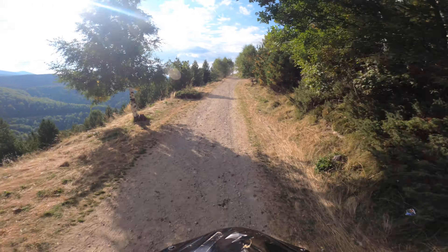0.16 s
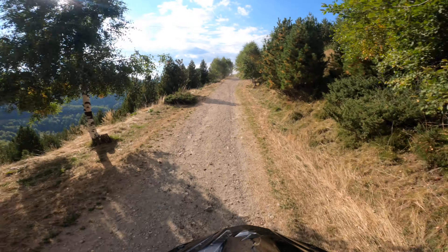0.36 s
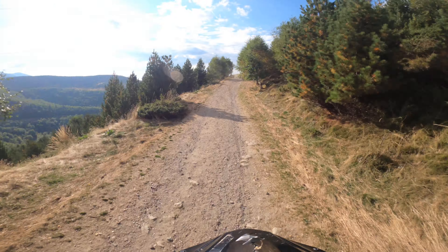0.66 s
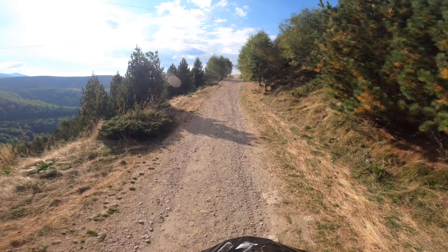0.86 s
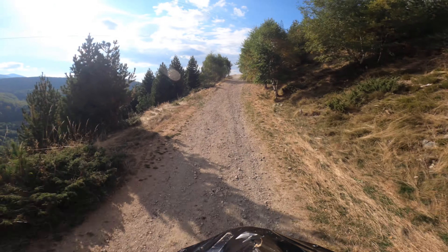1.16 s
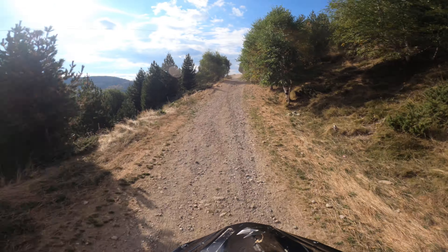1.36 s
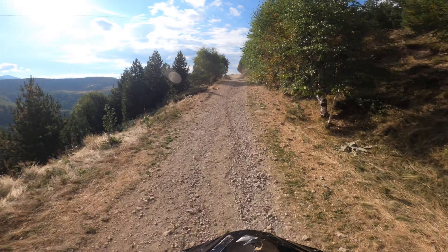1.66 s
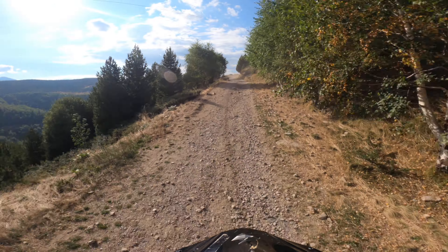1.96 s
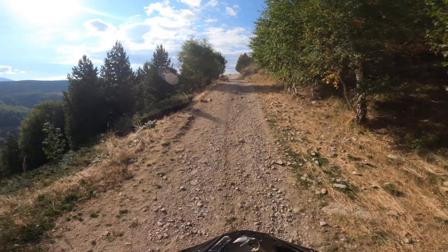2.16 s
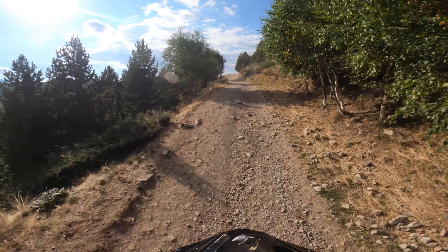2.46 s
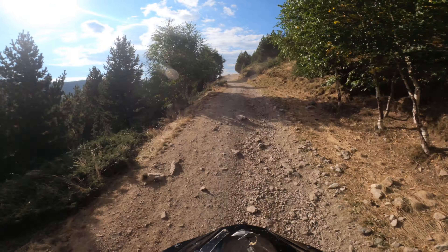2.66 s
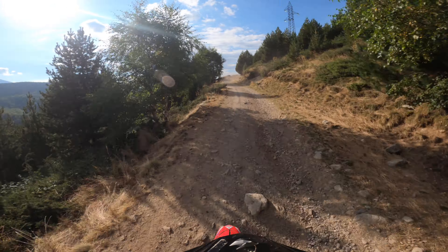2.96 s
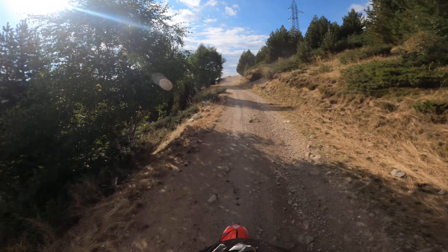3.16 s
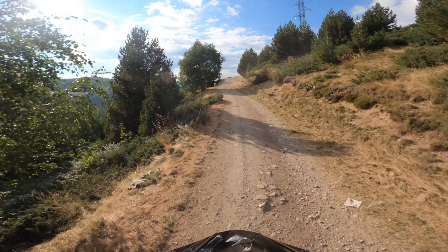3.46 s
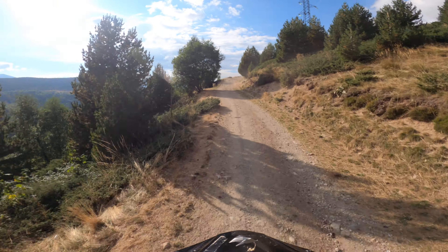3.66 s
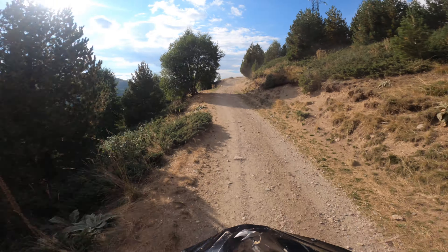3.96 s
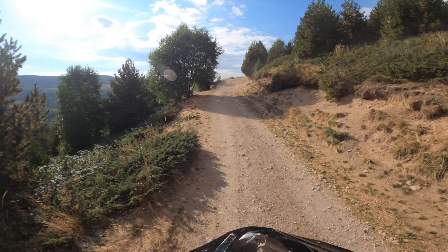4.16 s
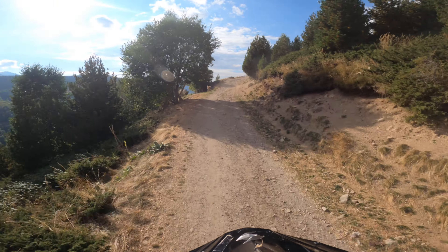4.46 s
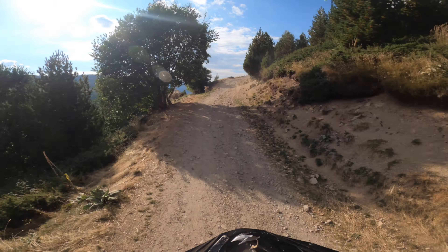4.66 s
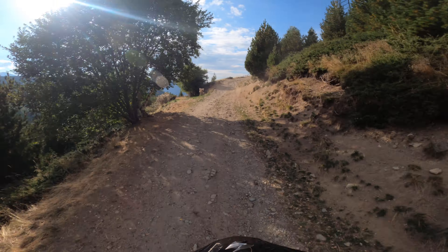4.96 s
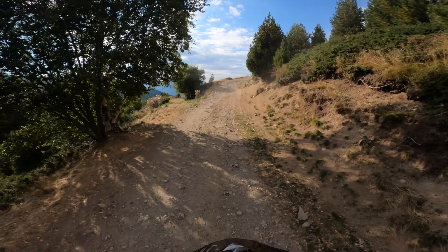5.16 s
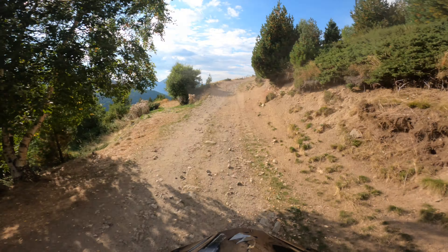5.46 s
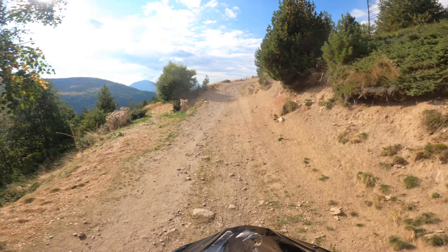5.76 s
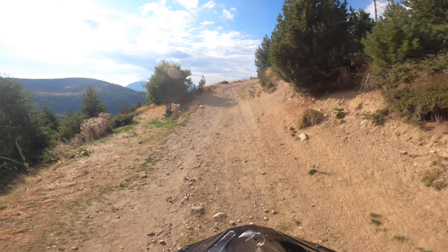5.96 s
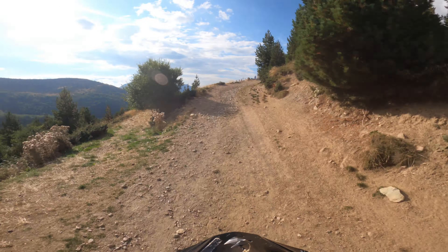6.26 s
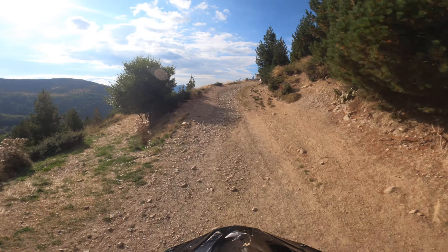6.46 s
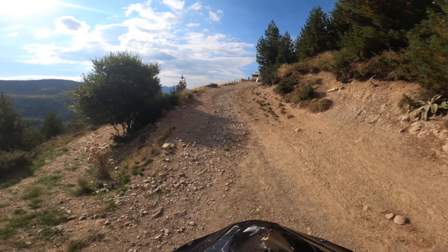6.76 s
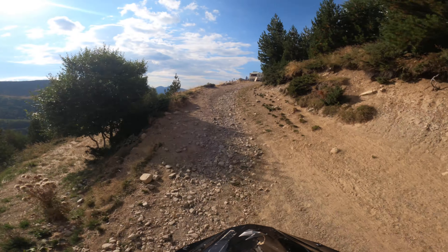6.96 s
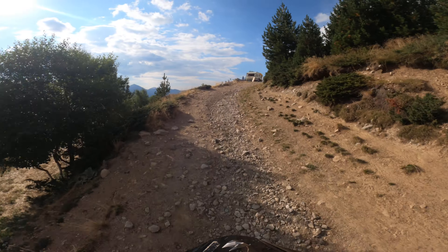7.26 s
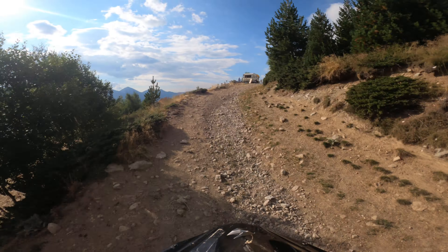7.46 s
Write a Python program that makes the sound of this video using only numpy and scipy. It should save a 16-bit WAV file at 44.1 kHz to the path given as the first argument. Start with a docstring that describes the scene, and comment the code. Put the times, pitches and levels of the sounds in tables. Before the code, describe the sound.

A single-cylinder four-stroke dirt bike is heard very close, from the rider's helmet, on an open gravel climb. A low wind buffet opens the scene and quickly eases while the engine throbs evenly on light throttle. At about 0.7 s it pulls harder, the revs rise slightly, loose gravel crunches, and metallic parts buzz along with each firing. From 2 to 3 s a low rumble of larger rocks joins in. At about 2.9 s the throttle opens wide: a loud, fuller, higher throb until 3.5 s, then a sudden drop, with a small flare near 3.8 s. From 4 s the revs sag steadily. After 5.5 s the beat turns ragged and raspy, strong and weak firings alternating, over crunching gravel and flung stones. By 6.7 s it lugs slowly and heavily to the end, a sharper stone tick near 6.8 s.

```python
"""Dirt bike climbing a gravel track

A single-cylinder four-stroke, heard from the rider's helmet: gas pulses ring the airbox and exhaust,
knocks and turbulence ring a rasp. The throttle opens, blips wide, then the revs sag and the engine limps.
Bike parts buzz, jolted once per cycle. Tyres roar, crunch and tick over loose stones, flick grit on each
power stroke and run over rocks; stones fly as decaying noise. Wind is noise that follows the gusts."""
import sys
import numpy as np
from scipy import signal
from scipy.fft import rfft, irfft
from scipy.io import wavfile
from scipy.ndimage import uniform_filter1d, minimum_filter1d

SR = 44100
rng = np.random.default_rng(int(sys.argv[2]) if len(sys.argv) > 2 else 0)


def master_out(mix):
    """Clip the mix to full scale and print it as 16-bit PCM to the path in sys.argv[1]."""
    frames = np.transpose(np.atleast_2d(mix))
    ceiling = np.clip(frames, -1, 1)
    pcm = np.round(ceiling * 32767).astype(np.int16)
    wavfile.write(sys.argv[1], SR, pcm)


N = 336042

# Throttle steps: 0 lugging, 1 stumbling, 2 light, 3 pulling, 4 wide open.
# Engine speed: t/s, firing rate/Hz
FIRING_RATE = [(0.0, 42.31), (0.14, 42.07), (0.25, 39.79), (0.38, 40.51), (0.61, 39.93), (0.65, 43.08),
               (0.7, 45.34), (0.82, 43.34), (1.02, 42.95), (1.2, 43.69), (1.49, 44.22), (1.58, 45.43),
               (1.65, 47.8), (1.76, 43.91), (1.87, 45.37), (2.01, 43.4), (2.13, 43.75), (2.24, 44.87),
               (2.35, 43.67), (2.66, 44.34), (2.95, 43.5), (3.07, 47.9), (3.13, 49.3), (3.22, 49.2),
               (3.3, 48.1), (3.39, 51.2), (3.46, 51.2), (3.53, 46.3), (3.62, 42.4), (3.69, 39.5),
               (3.75, 45.5), (3.8, 47.0), (3.88, 40.69), (4.1, 40.7), (4.46, 38.55), (4.65, 38.17),
               (5.07, 36.2), (5.45, 33.71), (5.8, 31.89), (6.2, 30.5), (6.5, 29.45), (6.56, 30.4),
               (6.61, 31.35), (6.68, 30.25), (6.98, 29.87), (7.13, 29.66), (7.36, 30.66), (7.62, 29.76)]
# Rider's hand: t/s, throttle step
THROTTLE = [(0, 2), (.6, 2), (.7, 3), (1.48, 3), (1.64, 3.3), (1.78, 3), (2.9, 3), (2.96, 4), (3.39, 4),
            (3.45, 3.4), (3.52, 2), (3.64, 1.85), (3.8, 2), (5.2, 2), (5.7, 1), (6.3, 1), (6.65, 0)]
# Source levels, one row per throttle step: thump/dB, rasp/dB, tyre roar/dB, grit/dB
STEP_LEVELS = [(-15.5, -29, -29, -49.5), (-19, -24.5, -29.5, -50.5), (-17.5, -32.5, -31, -51),
               (-17, -34, -26, -49), (-10, -33.5, -26.5, -46)]
# Unevenness of the firings at each throttle step (0-1)
STEP_UNEVENNESS = [.2, .6, .16, .15, .16]

# Airbox and exhaust resonances: f/Hz, width/Hz, polarity, five relative levels/dB (one per throttle step)
PIPE_MODES = [(74.6, 73, 1, -9.5, 4, -14, 1.5, 5.5), (142, 91.5, 1, -2, 4, 4, -5.5, -6),
              (186.3, 88, 1, -7, -15, -7, 4.5, -11.5), (241.6, 128, 1, -32.5, -2, -1, -1.5, 12),
              (327.1, 81.5, -1, -1.5, -4, 0.5, -1.5, -7.5), (303.4, 43, -1, -17, -12, -1.5, -18.5, 15.5),
              (358, 65, -1, -12.5, -27.5, -15, -29.5, 4.5), (605.5, 56, 1, -21.5, -8, -23, -13.5, -2),
              (760, 120, -1, -22, -19.5, -40, -17.5, -9.5), (470, 99, -1, -16.5, -14, -24.5, -34.5, -27.5)]
# Exhaust and engine casing resonances: columns as PIPE_MODES
RASP_MODES = [(610, 106, 1, -4.5, 10.5, 9, 5.5, 1), (803, 110, -1, -2, 2, -1, 5.5, 3.5),
              (948, 76, 1, 6, 5.5, 0.5, 1, -21), (1112, 177, -1, 5.5, 2, 4.5, -1.5, 1),
              (1420, 244, 1, -4, -3.5, -7.5, 3.5, -3.5), (1980, 1100, -1, -16.5, -13.5, -12.5, -30.5, -15),
              (3170, 2000, 1, -19, -32.5, -28, -17.5, -15.5), (3900, 1500, -1, -22, -37, -31, -25.5, -25.5)]
# Valve gear and gas knocks: place after the thump/cycles, level off load/dB, level under load/dB
KNOCKS = [(-.58, -3, -18), (-.4, 0, -3), (-.34, -1, -16), (-.245, -3, 0), (-.168, -4, -2), (.024, -5, -6),
          (.255, -7, -6)]
# Ringing bike parts: start/s, length/s, f/Hz, width/Hz, jolt after the thump/cycles, roughness (0-1), level/dB
BUZZES = [(.66, 1.25, 1140, 130, -.27, .55, -36.5), (1.92, 1.03, 1150, 110, -.27, .22, -32),
          (1.2, 1.75, 1420, 150, -.27, .35, -38.5), (1.42, .5, 745, 70, .18, .03, -32),
          (1.3, 1.0, 600, 120, .2, .03, -36.5), (2.93, .55, 730, 60, .133, .03, -32.5),
          (3.3, .2, 610, 70, .1, .03, -34), (5.05, .55, 1460, 130, -.3, .3, -44),
          (5.42, .5, 635, 90, -.36, .2, -35), (5.95, .7, 935, 45, -.245, .05, -38.5)]
# Strong and weak firings in turn: start/s, length/s, t of a strong firing/s, swing either way/dB
LIMPS = [(5.68, .39, 5.767, 3), (6.36, .24, 6.448, 2)]

# Relative spectra: f/Hz, density/(dB per Hz)
WIND_SPECTRUM = [(15, -17), (28, -5.5), (45, -3), (90, -2), (140, -6), (220, -9), (320, -12), (450, -20),
                 (900, -44)]
ROAR_SPECTRUM = [(250, 4.5), (420, -6.5), (620, -1), (800, -4.5), (1050, -6.5), (1400, -10), (1800, -18),
                 (3000, -25)]
GRAVEL_SPECTRUM = [(1500, -9), (2800, 11.5), (4000, 3), (5000, 0.5), (6300, -6), (7900, -11.5),
                   (9000, -21.5), (10700, -27.5), (12500, -32), (15000, -40.5)]
SPRAY_SPECTRUM = [(1300, -12), (1900, 5.5), (2800, 1), (4000, -9), (6000, -25), (8500, -33.5)]

# Wind before WIND_GAIN_DB: t/s, level/dB
GUSTS = [(0, -16), (.25, -29.5), (.6, -26.5), (.85, -22.5), (1.3, -27), (2.0, -21), (2.9, -25.5),
         (3.3, -22), (3.5, -20), (3.66, -23), (4.1, -23), (5.1, -23), (5.8, -23.5), (6.95, -22.5),
         (7.15, -29), (7.6, -23.5)]
# Patches of loose gravel: start/s, length/s, crunch level/dB
PATCHES = [(0.0, 0.19, -52), (.7, 0.38, -48), (1.88, .42, -52), (2.59, 0.34, -47), (3.363, 0.27, -45),
           (3.675, 0.19, -49), (5.553, 0.55, -48.5), (6.205, 0.13, -47.5), (6.8, 0.055, -50)]
# Stones flung by the tyres: t/s, peak before STONE_GAIN_DB and filtering/dB
STONES = [(0.7694, -39), (0.9494, -38), (1.4698, -40), (3.5588, -40), (4.4791, -42), (5.6194, -37),
          (5.8694, -37), (6.0194, -40), (6.8296, -33)]
# Flicked grit at each throttle step: level/dB
STEP_SPRAY_DB = [-52, -46, -53, -44, -45.5]
# Rumble over larger rocks: start/s, length/s, f/Hz, width/Hz, level/dB
ROCK_RUMBLE = (2, 1, 166, 147, -21)

PULSE_PLACE = 0.194  # main gas pulse, share of the cycle
PUFF_DB = -27  # turbulence with each gas pulse, at unevenness 1
GULP_DB = -17  # intake pulse half a cycle after the thump, wide open
RASP_NOISE, RASP_NOISE_PER_UNEVEN = .14, .65  # turbulent share of rasp power
RASP_DB_PER_HZ, CRUISE_HZ = 0.52, 41  # rasp grows with firing rate
OVERRUN_DB_PER_SURGE = 0.0676  # rasp flare per Hz/s of falling revs
HISS_DB = -52
UNEVEN_PER_SURGE, SURGE_S = .0007, .15  # extra unevenness per Hz/s; averaging window
BUMPS_PER_S = 9  # rough track shakes the load on the rear wheel
BUMP_RASP_DB, BUMP_GRIT_DB, BUMP_WOBBLE_CYCLES = .7, .7, .002  # per unit bump
TICKS_DB, STONE_GAIN_DB = -37, -14  # ticks relative to crunch
SPRAY_PER_S, SPRAY_PLACE = 1800, -.25  # grain rate at the stroke's height; cycles after the thump
WIND_GAIN_DB = 4.5
PATCH_EDGE_S, BUZZ_EDGE_S = 0.022, .06
LIMIT_PEAK, CUTOFF_HZ = .52, 15500


def from_db(db):
    """Decibels to gain."""
    return 10 ** (np.asarray(db) / 20)


def rms_one(x):
    """Scale to unit power."""
    return x / np.sqrt(np.mean(x ** 2) + 1e-20)


def evened(x, size=4400):
    """Hold power near one over a window in samples; the default spans several cycles."""
    power = uniform_filter1d(x ** 2, size=size)
    power = uniform_filter1d(power, size=size * 2 // 3)
    return x / np.sqrt(np.maximum(power, 1e-20))


def in_time(rows):
    """Interpolate each column of a curve to every sample."""
    t_s, *columns = np.transpose(rows)
    return [np.interp(np.arange(N) / SR, t_s, column) for column in columns]


def at_throttle(steps, throttle):
    """Glide between the values given for each throttle step."""
    return np.interp(throttle, np.arange(len(steps)), steps)


def pulling_load(throttle):
    """Load share: one at the pulling step, zero a step either side."""
    return np.clip(1 - abs(throttle - 3), 0, 1)


def drift(knots_per_s):
    """Slow random curve of unit power."""
    knots = rng.standard_normal(4000)
    return rms_one(np.interp(np.arange(N) / SR * knots_per_s, np.arange(len(knots)), knots))


def spell(start_s, length_s, edge_s):
    """Gate with sloping edges."""
    t = np.arange(N) / SR
    inside_s = np.minimum(t - start_s, start_s + length_s - t)
    return np.clip(.5 + inside_s / edge_s, 0, 1)


def coloured(x, spectrum):
    """Shape x with a smooth spectrum; unit power."""
    hz, db = np.transpose(spectrum)
    bins_hz = np.maximum(np.fft.rfftfreq(N, 1 / SR), 1)
    gain = from_db(np.interp(np.log(bins_hz), np.log(hz), db, left=-90, right=-90))
    return rms_one(irfft(rfft(x) * gain, N))


def resonate(x, hz, width_hz):
    """Two passes of one resonance: steep skirts, unit gain on top; width is per pass."""
    r = np.exp(-np.pi * width_hz / SR)
    top = (1 - r * r) / 2
    section = [top, 0, -top, 1, -2 * r * np.cos(2 * np.pi * hz / SR), r * r]
    return signal.sosfilt([section] * 2, x + 1e-18)


def body(drive, modes, throttle):
    """Parallel signed resonances, weighted by throttle and evened in power."""
    out = 0
    for hz, width_hz, polarity, *step_db in modes:
        gain = from_db(at_throttle(step_db, throttle))
        out = out + np.sign(polarity) * gain * resonate(drive, hz, width_hz)
    return evened(out)


def strokes(cycle, place, uneven, jitter_s, spread_db):
    """One click per cycle; unevenness scales its random shift and level."""
    at = np.flatnonzero(np.diff(np.floor(cycle - place)))
    late, strong = rng.standard_normal((400, 2))[:len(at)].T
    shift = (late * uneven[at] * jitter_s * SR).astype(int)
    clicks = np.zeros(N)
    clicks[(at + shift) % N] = from_db(strong * uneven[at] * spread_db)
    return clicks


def window(cycle, place, width):
    """Smooth gate opening once per cycle."""
    return np.exp(-(np.sin(np.pi * (cycle - place)) / (np.pi * width)) ** 2)


def wind():
    """Turbulence around the helmet: low noise that follows the gusts."""
    gain = from_db(in_time(GUSTS)[0] + WIND_GAIN_DB)
    return gain * evened(coloured(rng.standard_normal(N), WIND_SPECTRUM), size=1100)


def rocks():
    """Larger rocks under the wheels rumble the chassis: resonant noise."""
    start_s, length_s, hz, width_hz, db = ROCK_RUMBLE
    rumble = evened(resonate(rng.standard_normal(N), hz, width_hz))
    return from_db(db) * spell(start_s, length_s, PATCH_EDGE_S) * rumble


def tyre_roar():
    """Rolling tyres: steady noise of unit power."""
    return coloured(rng.standard_normal(N), ROAR_SPECTRUM)


def looseness(grit_db):
    """Crunch gain: powers of the grit and the loose patches add."""
    power = from_db(grit_db) ** 2
    for start_s, length_s, db in PATCHES:
        power = power + (from_db(db) * spell(start_s, length_s, PATCH_EDGE_S)) ** 2
    return np.sqrt(power)


def flying_stones():
    """Each flung stone is a decaying burst of noise through a broad resonance."""
    hits = np.zeros(N)
    for t_s, db in STONES:
        hits[int(t_s * SR)] = from_db(db)
    decay = np.exp(-1 / (0.0095 * SR))
    clatter = signal.lfilter([1], [1, -decay], hits + 1e-18) * rng.standard_normal(N)
    return from_db(STONE_GAIN_DB) * resonate(clatter, hz=4200, width_hz=4500)


def gravel(grit_db):
    """Grit under the tyres: noise and random chips crunch, the chips also tick; stones fly."""
    patches = drift(14)
    born = rng.random(N) < 500 * from_db(3 * patches) / SR
    sizes = from_db(5 * np.minimum(rng.exponential(1, N), 3.5))
    chips = born * rng.choice([-1, 1], N) * sizes
    grind = rng.standard_normal(N) * from_db(1.0 * patches)
    crunch = coloured(grind + .28 * rms_one(chips), GRAVEL_SPECTRUM)
    ticks = from_db(TICKS_DB) * rms_one(resonate(chips, hz=10200, width_hz=3700))
    return looseness(grit_db) * (crunch + ticks) + flying_stones()


def spray(cycle, throttle):
    """Each power stroke spins the rear tyre and flicks a clump of random grains at the bike."""
    rate_per_s = SPRAY_PER_S * window(cycle, place=PULSE_PLACE + SPRAY_PLACE, width=.22)
    sizes = rng.choice([-1, 1], N) * from_db(4 * np.minimum(rng.exponential(1, N), 3))
    grains = coloured((rng.random(N) < rate_per_s / SR) * sizes, SPRAY_SPECTRUM)
    return from_db(at_throttle(STEP_SPRAY_DB, throttle)) * grains


def buzz(cycle, uneven):
    """Bike parts ring in spells, jolted and rattled once per cycle."""
    out = 0
    for start_s, length_s, hz, width_hz, place, rough, db in BUZZES:
        jolts = strokes(cycle, PULSE_PLACE + place, uneven ** 2, jitter_s=.0004, spread_db=7.0)
        rattle = window(cycle, PULSE_PLACE + place, width=.1) * rng.standard_normal(N)
        drive = np.sqrt(1 - rough) * rms_one(jolts) + np.sqrt(rough) * rms_one(rattle)
        gain = from_db(db) * spell(start_s, length_s, BUZZ_EDGE_S)
        out = out - gain * evened(resonate(drive, hz, width_hz))
    return out


def hiss(cycle, throttle):
    """Gas spits bright noise once per cycle as the exhaust valve opens under load."""
    spits = window(cycle, place=PULSE_PLACE - .17, width=.12) * rng.standard_normal(N)
    spits = rms_one(resonate(spits, hz=2340, width_hz=640))
    return from_db(HISS_DB) * pulling_load(throttle) * spits


def rasp(cycle, throttle, uneven):
    """Knocks and gated turbulence ring the casing; load adds a long burst before the thump."""
    load = pulling_load(throttle)
    knocks = 0
    for place, idle_db, load_db in KNOCKS:
        clicks = strokes(cycle, PULSE_PLACE + place, uneven ** 2, jitter_s=.0003, spread_db=6.0)
        knocks = knocks + clicks * from_db(idle_db + load * (load_db - idle_db))
    # oil and casing soften the contacts
    soften = signal.butter(3, 1900, fs=SR, output="sos")
    knocks = signal.sosfilt(soften, knocks + 1e-18)
    valves = window(cycle, place=PULSE_PLACE - .39, width=.09)
    blowdown = load * window(cycle, place=PULSE_PLACE - .2, width=.14)
    gate = .55 + .3 * valves + .95 * blowdown
    noisy = np.clip(RASP_NOISE + RASP_NOISE_PER_UNEVEN * uneven, 0, .8)
    turbulence = body(gate * rng.standard_normal(N), RASP_MODES, throttle)
    return np.sqrt(1 - noisy) * body(knocks, RASP_MODES, throttle) + np.sqrt(noisy) * turbulence


def thump(cycle, throttle, uneven):
    """Gas pulses and turbulent puffs ring airbox and pipe; wide open, intake gulps sustain the ring."""
    pulses = strokes(cycle, PULSE_PLACE, uneven ** 2, jitter_s=.0015, spread_db=3.0)
    gulps = strokes(cycle, PULSE_PLACE + .5, uneven ** 2, jitter_s=.0015, spread_db=3.0)
    gulp_gain = from_db(GULP_DB) * np.clip(throttle - 3, 0, 1)
    puffs = window(cycle, place=PULSE_PLACE, width=0.13) * rng.standard_normal(N)
    puff_gain = from_db(PUFF_DB) * uneven
    return body(pulses + gulp_gain * gulps + puff_gain * puffs, PIPE_MODES, throttle)


def unevenness(rate_hz, throttle):
    """Firing is ragged when the engine stumbles and, short of wide open, while revs change fast."""
    surge = uniform_filter1d(abs(np.gradient(rate_hz)) * SR, size=int(SURGE_S * SR))
    extra = UNEVEN_PER_SURGE * surge * (throttle < 3.5)
    return np.clip(at_throttle(STEP_UNEVENNESS, throttle) + extra, 0, .75)


def limp(cycle):
    """Gain that makes firings alternately strong and weak while the engine stumbles."""
    gain_db = 0
    for start_s, length_s, strong_s, db in LIMPS:
        swing = np.cos(np.pi * (cycle - cycle[int(strong_s * SR)]))
        gain_db = gain_db + db * spell(start_s, length_s, BUZZ_EDGE_S) * swing
    return from_db(gain_db)


def scene():
    """Throttle sets engine and tyre levels; bumps shake both; wind blows over all."""
    rate_hz, throttle = in_time(FIRING_RATE)[0], in_time(THROTTLE)[0]
    bumps = drift(BUMPS_PER_S)
    cycle = np.cumsum(rate_hz) / SR - BUMP_WOBBLE_CYCLES * bumps  # bumps hold the crank back
    uneven = unevenness(rate_hz, throttle)
    levels_db = [at_throttle(steps, throttle) for steps in np.transpose(STEP_LEVELS)]
    thump_db, rasp_db, roar_db, grit_db = levels_db

    overrun = uniform_filter1d(np.maximum(-np.gradient(rate_hz) * SR, 0), size=int(.3 * SR))
    rasp_db = rasp_db + RASP_DB_PER_HZ * (rate_hz - CRUISE_HZ)
    rasp_db = rasp_db + OVERRUN_DB_PER_SURGE * overrun + BUMP_RASP_DB * bumps

    tyres = from_db(roar_db) * tyre_roar() + gravel(grit_db + BUMP_GRIT_DB * bumps)
    tyres = tyres + spray(cycle, throttle) + rocks()
    engine = from_db(thump_db) * thump(cycle, throttle, uneven)
    engine = engine + from_db(rasp_db) * rasp(cycle, throttle, uneven)
    engine = limp(cycle) * (engine + buzz(cycle, uneven) + hiss(cycle, throttle))
    return (wind() + tyres + engine)[None]


def record(dry):
    """A look-ahead limiter holds peaks down and evens the firings; a low-pass cuts the top."""
    room = np.minimum(1, LIMIT_PEAK / (abs(dry) + 1e-9))
    gain = uniform_filter1d(minimum_filter1d(room, size=600), size=600)
    low_pass = signal.cheby2(12, 60, CUTOFF_HZ, fs=SR, output="sos")
    return signal.sosfilt(low_pass, dry * gain)


dry = scene()
out = record(dry)
master_out(out)
```